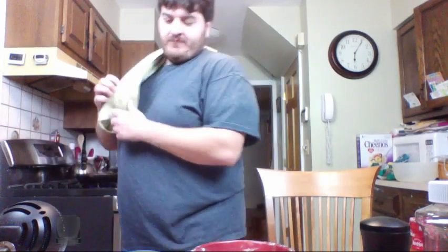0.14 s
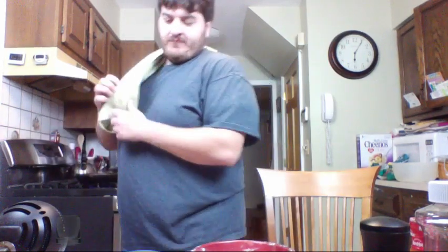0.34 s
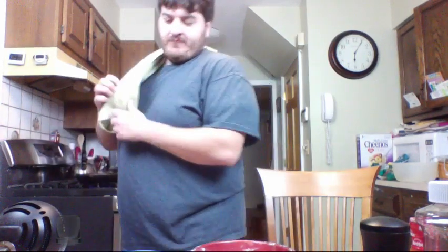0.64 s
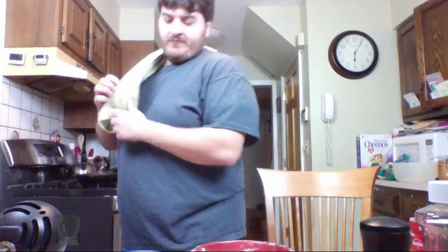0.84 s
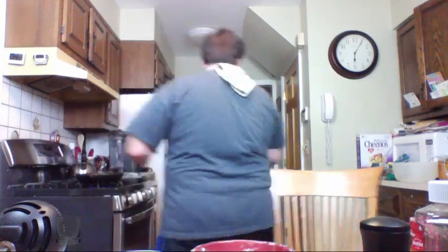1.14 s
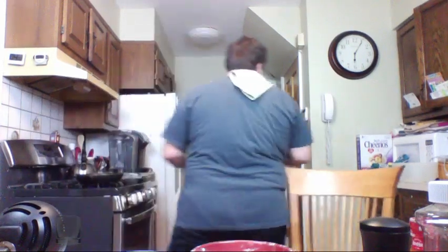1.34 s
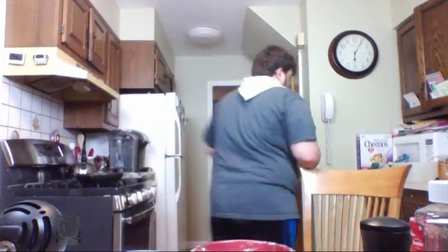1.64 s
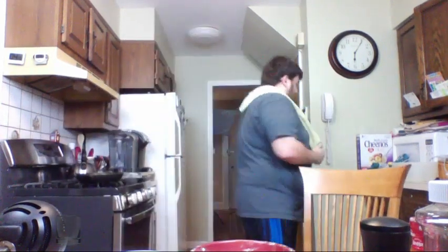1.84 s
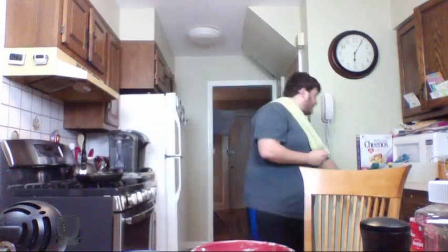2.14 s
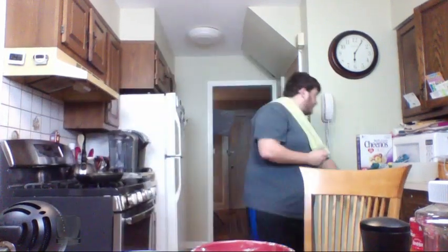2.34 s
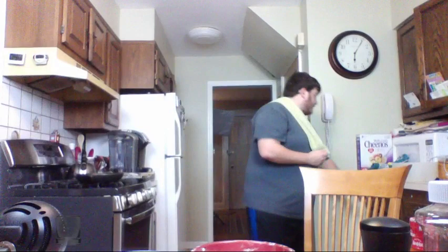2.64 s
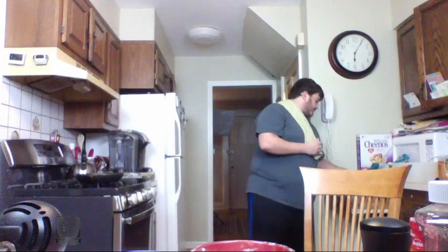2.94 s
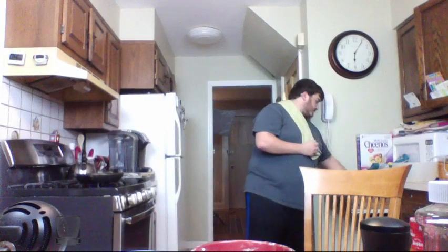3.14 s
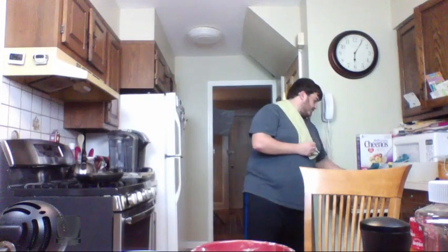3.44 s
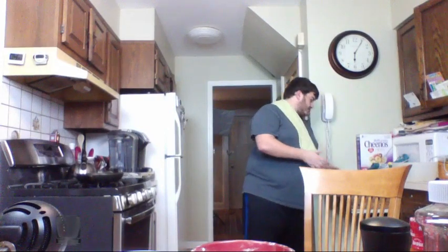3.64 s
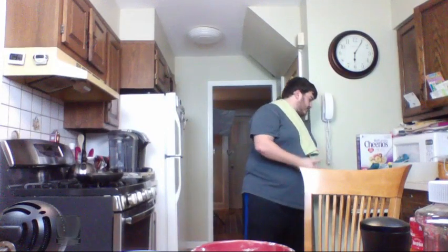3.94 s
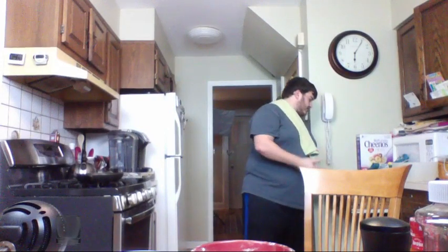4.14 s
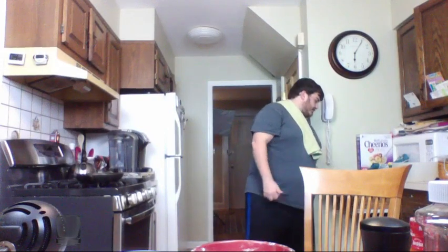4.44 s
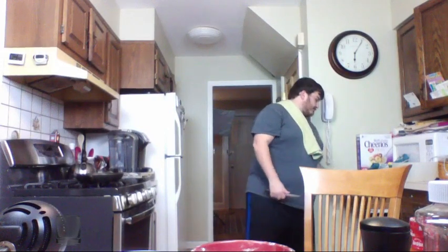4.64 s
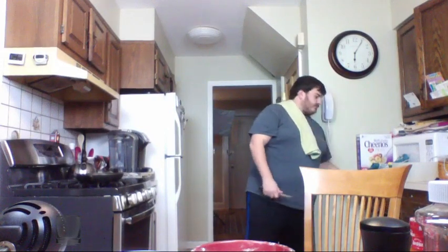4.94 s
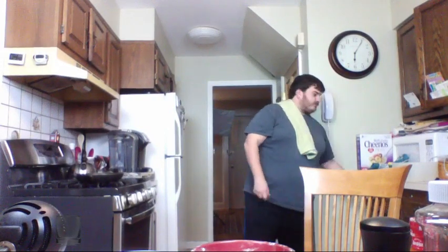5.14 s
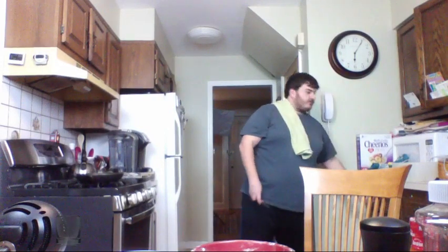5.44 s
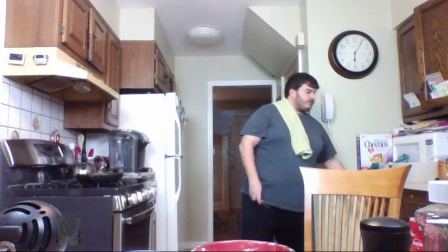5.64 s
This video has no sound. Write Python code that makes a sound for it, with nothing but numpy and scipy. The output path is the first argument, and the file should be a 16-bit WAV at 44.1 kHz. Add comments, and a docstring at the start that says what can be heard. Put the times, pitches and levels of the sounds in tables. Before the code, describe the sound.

A small home kitchen with short room reverberation, faint refrigerator hum and light microphone hiss. At the start a deep, soft floor thump swells under several dry snaps of a shaken cloth, until about 0.3 s. Near 0.8 s a cabinet door bangs, by far the loudest sound: a hollow wooden slam with rapid weakening bounces and a low, slowly dying jolt. Cloth flicks and rustling continue to 1.15 s, with a dull footstep around 1.25 s. From 1.9 to 2.3 s a wooden drawer rolls open with grainy rumble and small knocks. Between 2.5 and 2.9 s a hand rummages, cutlery clinking brightly and handles rattling against a plastic tray. It is nearly quiet until 3.8 s, then light scuffs, a clink at 4.2 s and the drawer rolling back. It knocks home sharply at 4.56 s with small rebounds. Faint low bumps and a light tap near 5.2 s follow.

```python
"""A low floor thump and snaps of a shaken cloth, then a cabinet door bangs shut in a home kitchen. A wooden drawer
rolls open, a hand rummages in cutlery, the drawer rolls back and knocks home, a few metres from a small microphone.
Blows are decaying noise plus damped modes; rolling and rubbing are grainy filtered noise. Jolts, many near 20 Hz,
are dying sines. Refrigerator tones hum over microphone hiss."""
import sys
import numpy as np
from scipy import signal
from scipy.fft import rfft, irfft, next_fast_len
from scipy.io import wavfile
from scipy.ndimage import uniform_filter1d, map_coordinates

SR = 44100
rng = np.random.default_rng(int(sys.argv[2]) if len(sys.argv) > 2 else 0)


def digitize_waveform(pressure):
    """Quantize a signal to 16-bit integers and store it at the path in sys.argv[1].

    Rows of a 2-D input are taken as channels; values are limited to [-1, 1].
    """
    field = np.atleast_2d(pressure).T
    bounded = np.clip(field, -1, 1)
    quanta = np.round(bounded * 32767).astype(np.int16)
    wavfile.write(sys.argv[1], SR, quanta)


N = 255339  # samples
TOP_HZ = 15850  # band limit


def amp(db):
    """Gain of a level in dB."""
    return 10 ** (np.asarray(db) / 20)


def unit(x):
    """x at rms 1."""
    return x / np.sqrt(np.mean(x ** 2) + 1e-20)


def along(points, hz):
    """Interpolate (Hz, value) points on a log frequency axis."""
    point_hz, value = np.transpose(points)
    return np.interp(np.log(hz + 1), np.log(point_hz + 1), value)


def wobble(rate_hz):
    """Smooth random curve with rate_hz knots a second."""
    knots = rng.standard_normal(int(N * rate_hz / SR) + 4)
    return map_coordinates(knots, [np.arange(N) * rate_hz / SR])


def coloured(x, spectrum):
    """x through a (Hz, relative dB) spectrum, at rms 1."""
    m = next_fast_len(len(x) + 4096)
    gain = amp(along(spectrum, np.fft.rfftfreq(m, 1 / SR)))
    return unit(irfft(rfft(x, m) * gain, m)[:len(x)])


def strokes(rows, shape):
    """Summed and separate gains: each stroke swells to full, sags while it lasts, then fades."""
    rise, sag, fall = shape
    start_s, length_s, level_db = np.transpose(rows)[:3, :, None]
    age = np.arange(N) / SR - start_s
    swell_db = rise * np.minimum(age, 0)
    sag_db = sag * np.clip(age, 0, length_s)
    fade_db = fall * np.maximum(age - length_s, 0)
    gains = amp(level_db + swell_db - sag_db - fade_db)
    return gains.sum(axis=0), gains


def grit(rate_hz, spread_db, share):
    """Noise whose size jumps in short grains: bumps under a rolling or rubbing contact."""
    hits = (rng.random(N) < rate_hz / SR) * amp(spread_db * rng.exponential(size=N))
    grain_s = 0.0023
    bumps = unit(signal.lfilter([1], [1, -np.exp(-1 / (grain_s * SR))], hits))
    return rng.standard_normal(N) * (1 + share * bumps)


def ringing(modes, t, stretch, scatter_db):
    """Damped modes at random strengths, each a detuned pair whose beating roughens the ring."""
    hz, db, t60 = np.transpose(modes)[:, :, None]
    luck = rng.standard_normal((4, len(modes), 1))
    t60_s = np.clip(t60, .02, .35) * stretch
    level = amp(db + scatter_db * luck[0] - 60 * t / t60_s)
    first = np.sin(2 * np.pi * hz * (1 + 0.0067 * luck[1]) * t)
    second = np.sin(2 * np.pi * hz * (1 + 0.0098 * luck[2]) * t + 9 * luck[3])
    return np.sum(level * (first + 0.61 * second), axis=0) / np.linalg.norm(amp(db))


# Room decay, stretched per blow. Each row: frequency in Hz, base t60 in s.
ROOM_DECAY = [(80, 0.59), (300, 0.45), (1200, 0.41), (4000, 0.39), (12000, 0.41)]


def fading(noise, stretch):
    """Noise dying at its own t60 in each frequency band."""
    hz, frame_s, z = signal.stft(noise, SR, nperseg=256)
    t60_s = stretch * along(ROOM_DECAY, hz)[:, None]
    return signal.istft(z * amp(-60 * frame_s / t60_s), SR, nperseg=256)[1]


def room(x, wet_db):
    """x plus its convolution with a random decaying tail: the kitchen's answer."""
    tail = fading(rng.standard_normal(SR // 2), 1)
    return x + amp(wet_db) * signal.fftconvolve(x, tail / np.linalg.norm(tail))[:N]


# Treble of a blow. Each row: frequency in Hz, relative level in dB.
CRACK_SPECTRUM = [(1500, -24), (2400, -1.5), (3500, -0.5), (5500, -5.5), (8500, -11.5), (16000, -24.5)]


def blows(events, body, bass, modes, ring_db, treble_db):
    """Each blow sets off body noise that dies band by band in the room, plus damped modes."""
    out, t = np.zeros(N + SR), np.arange(SR * 3 // 4) / SR
    for start_s, level_db, bass_db, stretch in events:
        noise = rng.standard_normal(len(t) + 1024)
        shake = coloured(noise, body) + amp(bass_db) * coloured(noise, bass)
        shake = shake + amp(treble_db) * coloured(noise, CRACK_SPECTRUM)
        tail = fading(shake, stretch)[:len(t)]
        direct = 1 + 0.26 * amp(-60 * t / 0.05)  # first arrival stands over the room's answer
        ring = amp(ring_db) * ringing(modes, t, 1.4 * stretch, scatter_db=3.0)
        onset = 1 - np.exp(-t / 0.001)
        out[round(start_s * SR):][:len(t)] += amp(level_db) * (direct * tail + ring) * onset
    return out[:N]


# Two lighter door contacts, the loud bang, then weakening bounces.
# Each row: start in seconds, level in dB, bass in dB.
DOOR_BANGS = [(0.682, -40.5, 3), (0.745, -34, 9), (0.789, -18.5, -3.5), (0.829, -24.5, -1.5),
              (0.874, -28.5, -6.5), (0.909, -35, 8)]
# Door panel, then its bass. Each row: frequency in Hz, relative level in dB.
PANEL_SPECTRUM = [(260, -38), (450, -11), (595, -0.5), (725, -6.5), (865, -3), (958, -2.5), (1300, -5),
                  (2600, -30.5), (3380, -66.5), (5720, -120)]
THUD_SPECTRUM = [(41, -52.5), (70, -24), (112, -10), (242, -7.5), (334, -4), (387, -9.5), (500, -10),
                 (650, -39.5), (1100, -120)]
# Door modes. Each row: frequency in Hz, relative level in dB, t60 in s before clip and stretch.
DOOR_MODES = [(182, -10.5, 0.15), (217, -1, 0.33), (288, 5, 0.31), (325, -0.5, 0.47), (480, -6, 0.47),
              (498, -4.5, 0.78), (551, -5, 0.37), (673, -2, 0.074), (885, -4, 0.2), (1025, -11.5, 0.25),
              (1113, -6.5, 0.32), (1240, -12, 0.6), (1340, -9.5, 0.43), (1408, -14.5, 0.13)]
DOOR_STRETCH = 0.73


def cabinet_door():
    """Panel noise, a bass thud and door modes per contact."""
    events = [(*row, DOOR_STRETCH) for row in DOOR_BANGS]
    return blows(events, PANEL_SPECTRUM, THUD_SPECTRUM, DOOR_MODES, ring_db=-1, treble_db=-33.5)


# Knocks on drawer and carcass, and a dull footstep at 1.255 s.
# Each row: start in seconds, level in dB, bass in dB, decay stretch (ratio).
KNOCKS_AND_STEP = [(0.045, -62.5, 0, 0.5), (0.146, -51.5, -28, 0.68), (0.593, -59, -4, 1),
                   (1.141, -47, -18, 0.51), (1.255, -59.5, 16, 0.75), (1.451, -59, -3, 0.65),
                   (1.639, -66, -21, 1), (1.869, -50, -16, 0.31), (1.897, -46, -20, 0.34),
                   (1.995, -45.5, -12, 0.76), (2.153, -42, -8, 0.38), (2.281, -45.5, -3, 0.23),
                   (2.527, -41.5, -13.5, 0.66), (2.813, -42.5, -13.5, 0.82), (3.958, -53, -2, 0.8),
                   (4.103, -60, 9, 0.91), (4.326, -52.5, -16, 0.53), (4.563, -30.5, -11.5, 0.78),
                   (4.614, -39.5, -5.5, 0.78), (4.649, -47, -18, 0.45), (5.178, -61.5, -16, 0.63)]
# Wood body, then bass rumble. Each row: frequency in Hz, relative level in dB.
WOOD_SPECTRUM = [(240, -39), (400, -14.5), (475, -4.5), (514, -11.5), (556, -2.5), (803, -7), (1060, 1.5),
                 (2600, -21), (3380, -89), (5720, -120)]
RUMBLE_SPECTRUM = [(41, -43), (70, -16.5), (151, 0), (183, -11.5), (220, 1), (286, -6), (400, -7.5),
                   (520, -32.5), (880, -120)]
# Drawer and carcass modes. Each row: frequency in Hz, relative level in dB, t60 in s before clip and stretch.
CARCASS_MODES = [(230, -7, 0.46), (301, -0.5, 0.39), (482.5, 4, 0.2), (550.6, 4.5, 0.24), (617, -1, 0.3),
                 (1069, -4.5, 0.33), (1171, -18.5, 0.38), (1127, -21.5, 0.35), (1258, -1.5, 0.544),
                 (1420, -11.5, 0.36), (1775, -14, 0.24), (2143, -18.5, 0.47)]


def knocks_and_step():
    """Wood noise, bass rumble and carcass modes per blow; the footstep is mostly bass."""
    return blows(KNOCKS_AND_STEP, WOOD_SPECTRUM, RUMBLE_SPECTRUM, CARCASS_MODES, ring_db=-5.5, treble_db=-17.5)


# Drawer rolling and short scuffs. Each row: full level from in seconds, length in seconds,
# level in dB, rumble share in dB.
ROLLS_AND_SCUFFS = [(0.166, 0.014, -51, -20), (0.945, 0.25, -56, -0.5), (1.695, 0.1, -67, -2),
                    (1.924, 0.36, -46, -7.5), (3.442, 0.0079, -73.5, -3), (3.864, 0.14, -66, -6),
                    (4.017, 0.2, -54, -5.5), (4.295, 0.28, -57.5, 0), (4.912, 0.043, -75, -3),
                    (5.19, 0.012, -71, -4)]
# Rise, sag while moving and fall, in dB per s.
ROLL_DB_PER_S = (116, 22, 87)
# Grainy part. Each row: frequency in Hz, relative level in dB.
ROLL_SPECTRUM = [(180, 1.5), (300, -14), (354, -2.5), (566, 2.5), (855, -3), (1070, 4), (1250, 0.5),
                 (1390, -3), (2140, -12.5), (2350, -16.5), (5000, -25.5), (6500, -35.5), (11000, -120)]


def rolls_and_scuffs():
    """Drawer rolling and short scuffs: grainy rolling noise over a low rumble."""
    total, gains = strokes(ROLLS_AND_SCUFFS, ROLL_DB_PER_S)
    roll = coloured(grit(rate_hz=130, spread_db=2.0, share=0.29), ROLL_SPECTRUM) * amp(2.8 * wobble(25))
    rumble = coloured(rng.standard_normal(N), RUMBLE_SPECTRUM) * amp(2.1 * wobble(11.0))
    rumble_gain = amp(np.transpose(ROLLS_AND_SCUFFS)[3]) @ gains
    return room(total * roll + rumble_gain * rumble, wet_db=-5.0)


# Bright clicks: cutlery contacts, plus the sharp crack of the door bang.
# Each row: start in seconds, level in dB, brightness in dB, note in Hz, crackle t60 in s.
BRIGHT_CLICKS = [(0.7886, -45, -31, 3450, 0.32), (1.8945, -62.5, -9, 3260, 0.19),
                 (1.9679, -51, -12, 4500, 0.15), (1.9879, -49, -14.5, 4440, 0.14),
                 (2.2109, -51, -32, 4840, 0.28), (2.2811, -53.5, 4, 4900, 0.16),
                 (2.2994, -59.5, 6.5, 7280, 0.18), (2.5401, -58.5, -14.5, 3380, 0.46),
                 (2.5975, -53, -10.5, 5700, 0.15), (2.6137, -54, -4, 3400, 0.13),
                 (2.7177, -46.5, -4.5, 6240, 0.11), (2.7444, -51.5, -10, 3300, 0.28),
                 (2.8155, -55, -7.5, 3900, 0.4), (2.8464, -45, -4.5, 4350, 0.14),
                 (2.874, -39, -7.5, 4900, 0.21), (3.4318, -74, -9, 5000, 0.17),
                 (3.8195, -67.5, -3, 4560, 0.11), (4.0003, -62.5, -38, 4570, 0.13),
                 (4.2373, -50.5, -9.5, 5600, 0.15), (4.5631, -39.5, -13.5, 4070, 0.2),
                 (4.6294, -59.5, -10, 3300, 0.42), (4.7186, -63, 9, 7900, 0.13),
                 (5.1791, -61.5, -19, 3410, 0.17)]
# Common ring. Each row: frequency in Hz, relative level in dB, t60 in s before clip and stretch.
CLICK_MODES = [(4460, -6, 0.24), (4990, -1.5, 0.15), (5570, -3.5, 0.14), (5810, -9, 0.7), (6050, -6, 0.062),
               (8247, -19, 5.0), (8300, 4.5, 0.027), (9500, -7.5, 0.037), (11900, -10.5, 0.18)]
# Partials of one click. Each row: multiple of the note (ratio), level in dB before brightness tilt.
NOTE_PARTIALS = [(0.998, 6), (1.49, -4.5), (2.15, -8.5)]
CLICK_RING_DB = -6


def clicks(events, ring_db):
    """Bright contacts: a fading noise crackle, a common ring and each contact's own notes."""
    out, t = np.zeros(N + SR), np.arange(SR // 2) / SR
    bands_hz = np.geomspace(2000, 16000, num=24)
    for start_s, level_db, bright_db, note_hz, t60_s in events:
        colour = [(1500, -30.0), (3000, -3.0), (5000, -5), (7500, -3.5 + .5 * bright_db),
                  (10000, bright_db), (15000, bright_db - 2.0)]
        # every contact favours other bands
        uneven_db = along(colour, bands_hz) + rng.normal(0, 2.5, len(bands_hz))
        hiss = coloured(rng.standard_normal(len(t)), [(1200, -60), *zip(bands_hz, uneven_db)])
        # separate level flutter for crackle and ring
        flutter = 1 + 0.14 * unit(uniform_filter1d(rng.standard_normal((2, len(t))), size=130))
        crackle = hiss * flutter[0] * amp(-60 * t / t60_s) * (1 - np.exp(-t / 0.0027))
        notes = [(k * note_hz, partial_db + (k - 1) * (bright_db + 4.5), .1)
                 for k, partial_db in NOTE_PARTIALS if k * note_hz < TOP_HZ]
        ring = ringing(CLICK_MODES, t, 4 * t60_s, scatter_db=5.0)
        ring = ring + amp(1) * ringing(notes, t, 1.0, scatter_db=3.5)
        ring = ring * flutter[1] * (1 - np.exp(-t / .0004))
        out[round(start_s * SR):][:len(t)] += amp(level_db) * (crackle + amp(ring_db) * ring)
    return out[:N]


# Handles tapping the tray. Each row: start in seconds, level in dB.
TRAY_TAPS = [(2.495, -53.5), (2.54, -47.5), (2.602, -47), (2.626, -52.5), (2.677, -49), (2.698, -47),
             (2.739, -50), (2.847, -47.5)]
# Tray body. Each row: frequency in Hz, relative level in dB.
TRAY_SPECTRUM = [(240, -26), (400, -19.5), (462, -5), (502, -12), (847, -8.5), (1170, -6), (1270, -5.5),
                 (1350, -6), (3000, -32), (3900, -54), (6600, -120)]
# Plastic tray modes. Each row: frequency in Hz, relative level in dB, t60 in s before clip and stretch.
TRAY_MODES = [(975, -11, 5.0), (1198, -1.5, 0.47), (1430, -7, 5.0), (1704, -6.5, 0.075), (1850, -16, 0.52),
              (2140, -4, 0.055)]
TRAY_BASS_DB, TRAY_STRETCH = -21, 0.66


def tray_taps():
    """Tray noise, little bass and plastic modes per tap."""
    events = [(*row, TRAY_BASS_DB, TRAY_STRETCH) for row in TRAY_TAPS]
    return blows(events, TRAY_SPECTRUM, RUMBLE_SPECTRUM, TRAY_MODES, ring_db=1.5, treble_db=-29.5)


# A hand stirring the tray. Each row: full from in seconds, length in seconds, level in dB.
TRAY_STIRS = [(2.488, 0.45, -54)]
# Rise, sag and fall, in dB per s.
STIR_DB_PER_S = (930, 0.77, 250)


def rummage():
    """Handles rattle against the tray: dense grains of noise in the tray's colour."""
    rattle = coloured(grit(rate_hz=120, spread_db=2.0, share=0.74), TRAY_SPECTRUM)
    return room(strokes(TRAY_STIRS, STIR_DB_PER_S)[0] * rattle, wet_db=-4.5)


# Flicks of the cloth. Each row: start in seconds, level in dB, brightness in dB.
CLOTH_FLICKS = [(0.101, -53.5, -10), (0.1358, -54, -10), (0.1454, -50, -23), (0.197, -56, -11),
                (0.231, -48.5, -9.5), (0.3298, -61, -14), (0.586, -68, -13.5), (0.6097, -61, -8.5),
                (0.857, -52, -11), (0.91, -56, -14), (0.957, -51.5, -8), (1.0123, -51, -9.5),
                (1.0996, -55, -4), (1.1362, -51, -21)]
FLICK_T60_S, FLICK_NOTE_HZ, FLICK_RING_DB = 0.18, 3720, -12.5


def flicks():
    """Dry snaps: the click's noise burst with a weaker ring."""
    return clicks([(*row, FLICK_NOTE_HZ, FLICK_T60_S) for row in CLOTH_FLICKS], FLICK_RING_DB)


# Cloth and small things rubbing. Each row: full from in seconds, length in seconds, level in dB.
CLOTH_RUSTLES = [(0.19, 0.018, -60), (0.82, 0.29, -60.5), (2.0, 0.19, -67.5), (2.6, 0.18, -66),
                 (4.1, 0.16, -71), (5.0, 0.19, -81.5), (5.45, 0.13, -78.5)]
# Rise, sag and fall, in dB per s.
RUSTLE_DB_PER_S = (67, 5, 80)
# Cloth friction. Each row: frequency in Hz, relative level in dB.
CLOTH_SPECTRUM = [(1180, -29), (2000, 1.5), (2110, -7.5), (4010, -8.5), (5880, -9.5), (6360, -13),
                  (13600, -22), (16000, -25)]


def rustles():
    """Fine friction grains in noise."""
    rub = coloured(grit(rate_hz=70, spread_db=-1.5, share=0.47), CLOTH_SPECTRUM)
    return room(strokes(CLOTH_RUSTLES, RUSTLE_DB_PER_S)[0] * rub, wet_db=-5.5)


# Steps and blows that set a low mode of floor or carcass swinging.
# Each row: start in seconds, level in dB, frequency in Hz.
LOW_JOLTS = [(.005, -30.5, 31), (0.059, -24.5, 20.6), (.79, -27.5, 30), (0.833, -23, 21.3), (1.9, -50, 100),
             (4.568, -46, 87), (4.6, -45.5, 23), (4.941, -39.5, 18.1), (5.191, -48.5, 20.13),
             (5.641, -51, 40), (5.661, -44, 15)]
# Swing decay. Each row: frequency in Hz, t60 in s.
SWING_DECAY = [(20, 3.44), (33, 0.54), (85, .9)]
# Swing onset. Each row: frequency in Hz, rise time constant in s.
SWING_ONSET = [(20, .04), (33, 0.006), (85, 0.017)]


def sway():
    """Dying low modes, with a faint noise shudder following their size."""
    t, swing, size = np.arange(N) / SR, 0, 0
    for start_s, level_db, hz in LOW_JOLTS:
        age = np.clip(t - start_s, 0, None)
        onset = 1 - np.exp(-age / along(SWING_ONSET, hz))
        level = amp(level_db - 60 * age / along(SWING_DECAY, hz)) * onset
        swing = swing + level * np.sin(2 * np.pi * hz * age)
        size = size + level
    shudder = coloured(rng.standard_normal(N), [(6, -15.5), (28, 4.5), (50, -5.5), (90, -23.0), (130, -68.5)])
    return swing * amp(0.95 * wobble(5.6)) + amp(-26.0) * size * shudder


# Refrigerator tones. Each row: frequency in Hz, mean level in dB rms.
FRIDGE_HUM = [(118.4, -70.5), (1610, -95), (3521, -100), (6024, -101)]
# Hiss and room air. Each row: frequency in Hz, relative level in dB.
HISS_SPECTRUM = [(6, -14), (12, -3), (27, 1), (50, -10), (80, -17), (160, -22), (230, -15), (383, -26),
                 (461, -25.5), (555, -30), (1400, -23.5), (1750, -32), (3230, -38.5), (16100, -45)]
HISS_DB = -64.5


def background():
    """Coloured noise for microphone hiss and room air; slightly unsteady sines for the refrigerator."""
    t, hum = np.arange(N) / SR, 0
    for hz, level_db in FRIDGE_HUM:
        hum = hum + amp(level_db + .8 * wobble(5)) * np.sin(2 * np.pi * hz * t + .15 * wobble(8))
    air = coloured(rng.standard_normal(N), HISS_SPECTRUM) * amp(HISS_DB + 1.1 * wobble(1.5))
    return np.sqrt(2) * hum + air  # sqrt(2): rms to peak


def scene():
    """All sources at one microphone."""
    hits = cabinet_door() + knocks_and_step() + tray_taps() + clicks(BRIGHT_CLICKS, CLICK_RING_DB) + flicks()
    return (hits + rolls_and_scuffs() + rummage() + rustles() + sway() + background())[None]


def record(dry):
    """The microphone's chain keeps nothing above its band limit."""
    m = next_fast_len(N + 4096)
    # ramp back to the first sample so the FFT wraps without a step
    held = np.pad(dry, ((0, 0), (0, m - N)), "linear_ramp", end_values=dry[0, 0])
    return irfft(rfft(held) * (np.fft.rfftfreq(m, 1 / SR) < TOP_HZ), m)[..., :N]


dry = scene()
out = record(dry)
digitize_waveform(out)
```